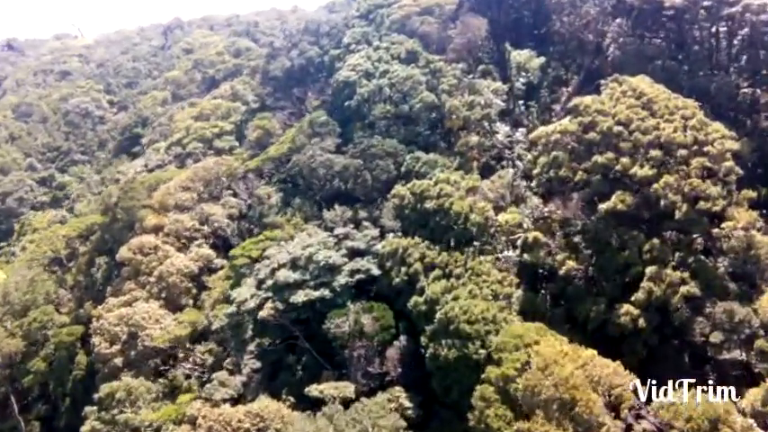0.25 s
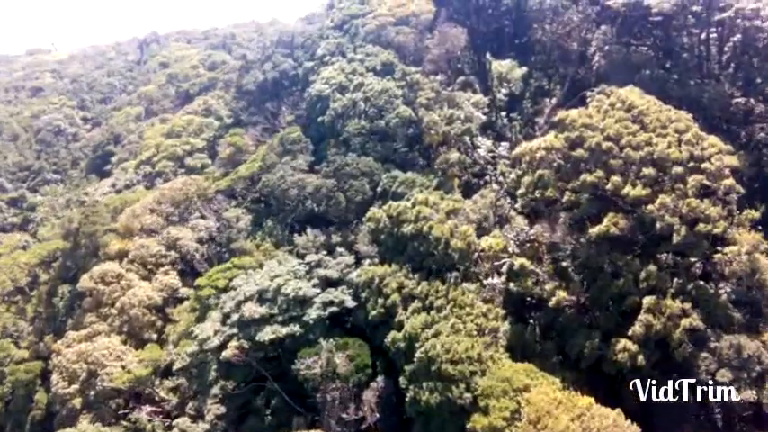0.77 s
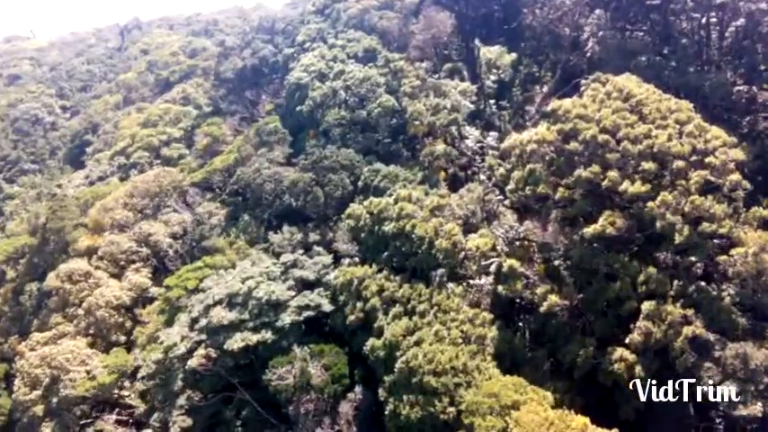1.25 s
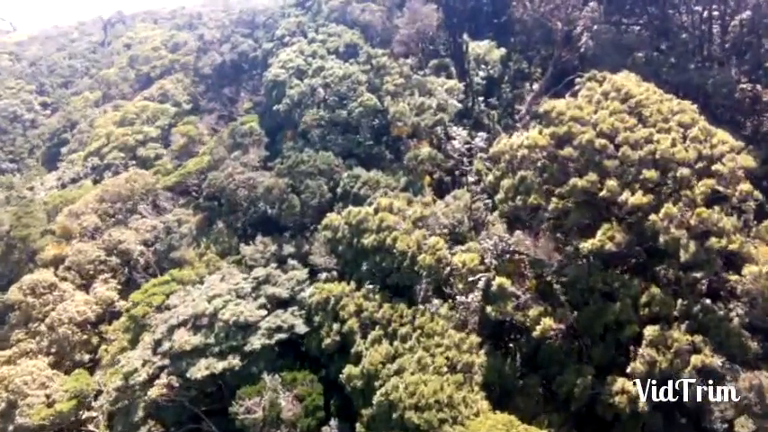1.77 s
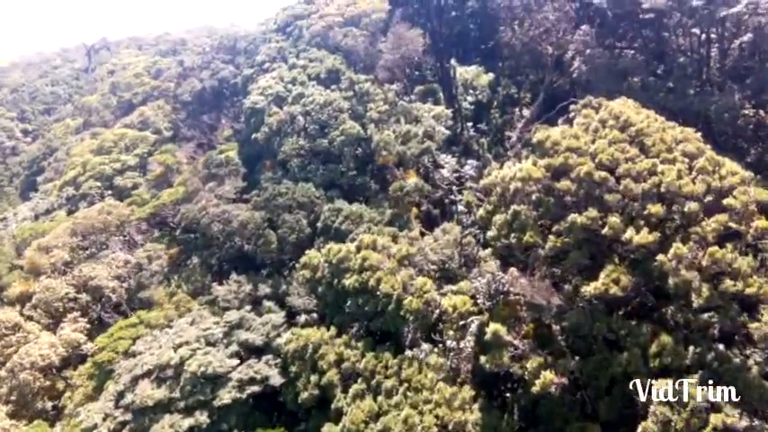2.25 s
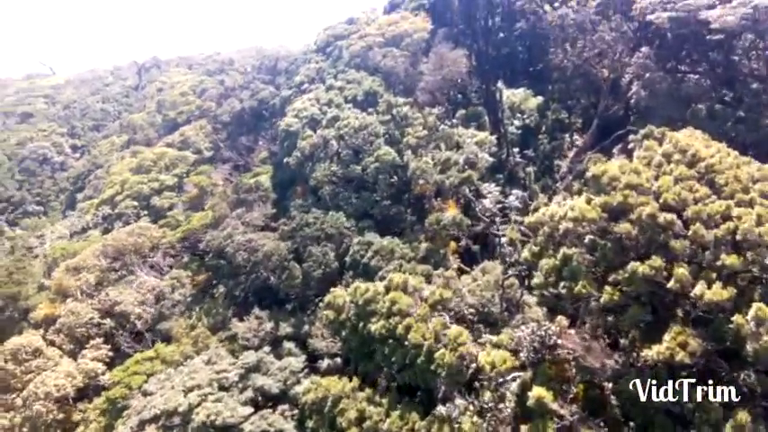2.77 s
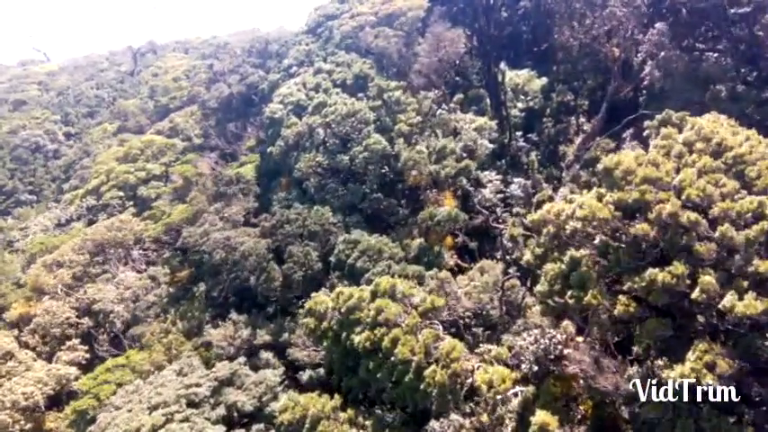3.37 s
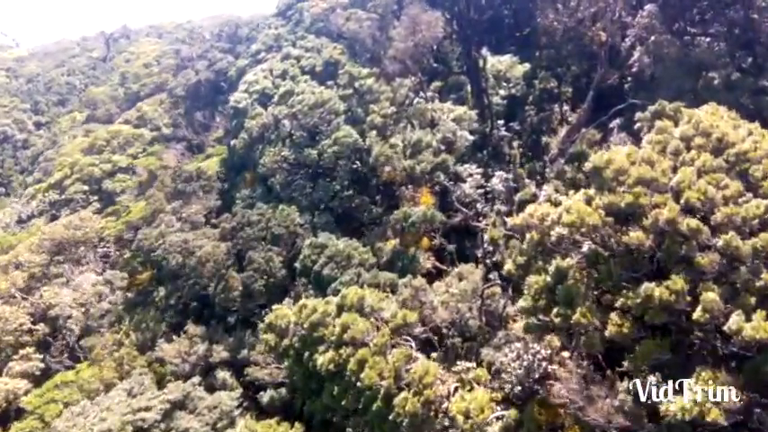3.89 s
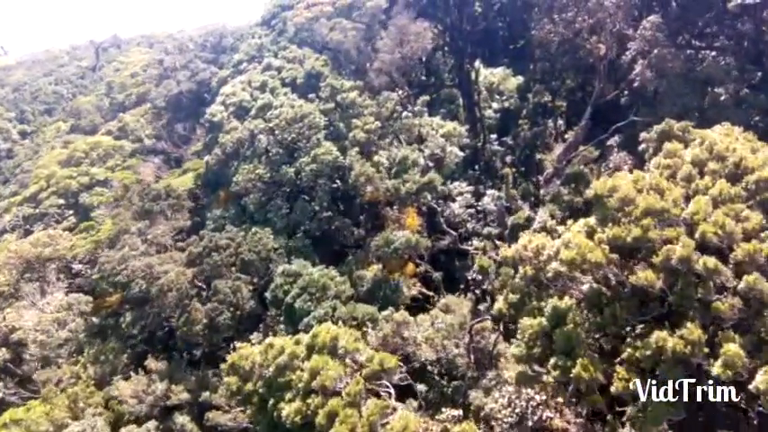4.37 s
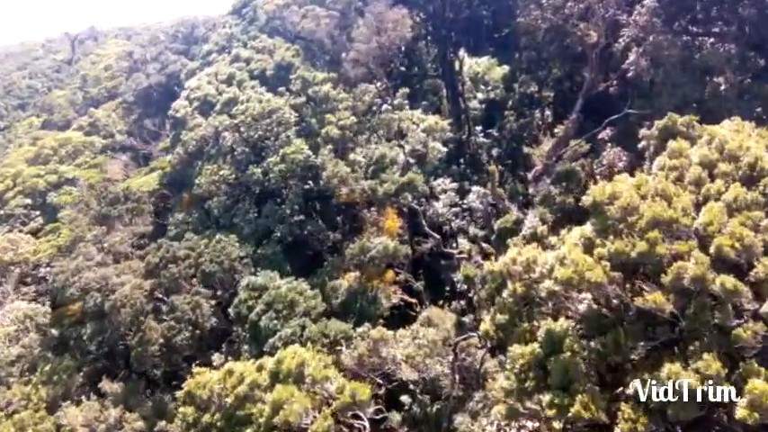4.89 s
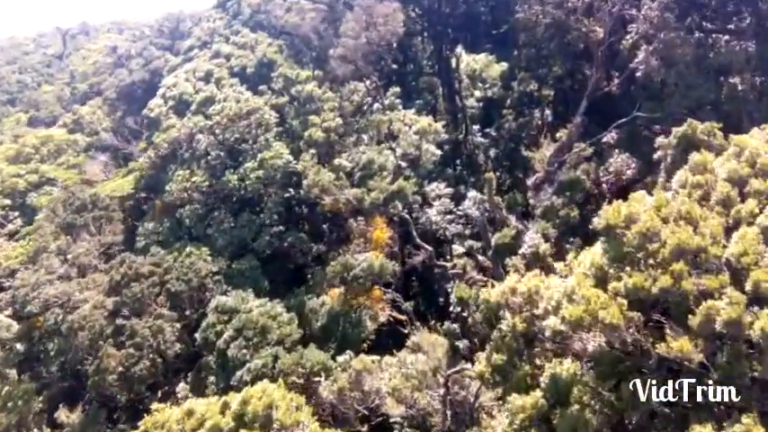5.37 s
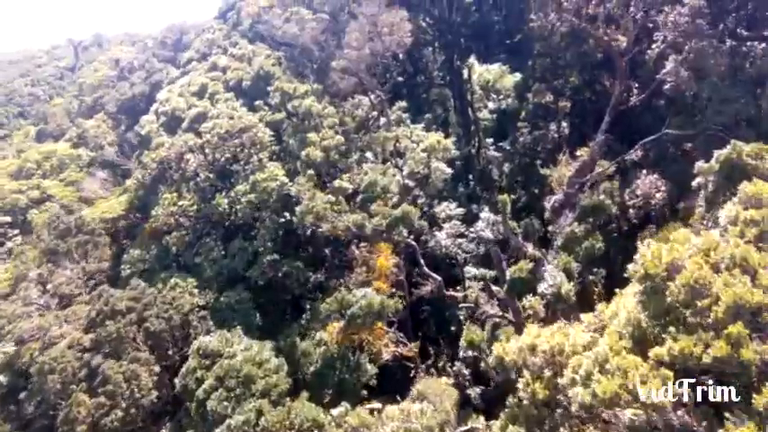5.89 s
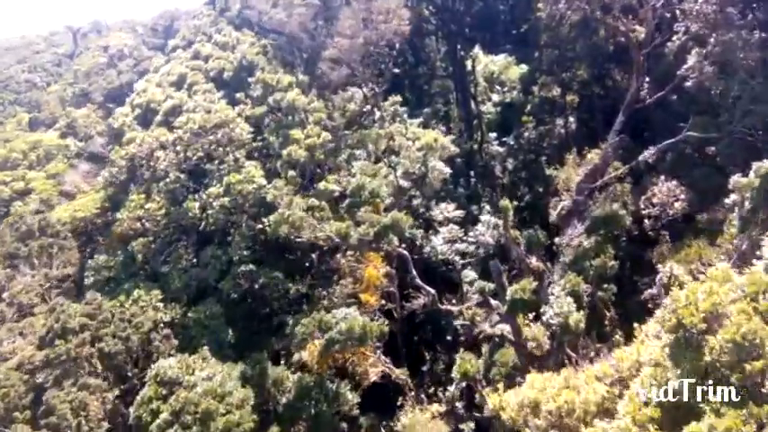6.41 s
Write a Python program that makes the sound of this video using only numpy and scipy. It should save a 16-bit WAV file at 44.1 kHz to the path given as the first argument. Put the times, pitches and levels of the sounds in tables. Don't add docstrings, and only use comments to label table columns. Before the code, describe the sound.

Wind pops and flutters hard against a small stereo microphone, heavier in the left ear, the right one sheltered. Beneath it steel wheels run over a stranded wire with a rough, hissing, metallic whirr and a faint wavering hum that gradually sinks. Later the wind drops to short, weak puffs, and the wheel grind stays in front, slightly quieter, broken by tiny metallic ticks. Outdoors, dry and close.

```python
import sys
import numpy as np
from scipy import signal
from scipy.fft import rfft, irfft, next_fast_len
from scipy.io import wavfile
from scipy.ndimage import uniform_filter1d

SR = 44100
rng = np.random.default_rng(int(sys.argv[2]) if len(sys.argv) > 2 else 0)


def nominal_scale(level):
    x = np.asarray(level, float) / 20
    return 10 ** x


def unload_audio(sound):
    columns = np.transpose(np.atleast_2d(sound))
    steps = np.round(np.clip(columns, -1, 1) * 32767)
    wavfile.write(sys.argv[1], SR, steps.astype(np.int16))


N = 292824
SIZE = next_fast_len(N + 8192)
HZ = np.arange(SIZE // 2 + 1) * SR / SIZE + 1e-3


def at_hz(points):
    hz, value = np.transpose(points)
    return np.interp(np.log(HZ), np.log(hz), value)


def rms_one(x):
    return x / np.sqrt(np.mean(x ** 2) + 1e-20)


def drift(rate):
    r = np.exp(-40 * np.pi * rate / SR)
    noise = rng.standard_normal(N // 20 + 2002)
    slow = signal.lfilter([1], [1, -2 * r, r * r], noise)[2000:]
    return np.interp(np.arange(N) / 20, np.arange(len(slow)), rms_one(slow))


def shape(x, response):
    return irfft(rfft(x, SIZE) * response, SIZE)[..., :N]


def ring(clicks, hz, width_hz):
    r, w = np.exp(-np.pi * width_hz / SR), 2 * np.pi * hz / SR
    return signal.lfilter([0, np.sin(w)], [1, -2 * r * np.cos(w), r * r], clicks + 1e-18)


GUST_ATTACK_S, GUST_RELEASE_S, LULL_DB = 0.038, 0.038, -48


def gust_strength(gusts):
    t = np.arange(0, N + 50, 50) / SR
    start_s, length_s, db = np.transpose(gusts)[:, :, None]
    swell = np.clip((t - start_s) / GUST_ATTACK_S + 1, 0, 1)
    decay = np.exp(-np.maximum(t - start_s - length_s, 0) / GUST_RELEASE_S)
    total = nominal_scale(LULL_DB) + (nominal_scale(db) * swell * decay).sum(axis=0)
    return np.interp(np.arange(N) / SR, t, 20 * np.log10(total))


# frequency in Hz, level in dB per Hz.
WIND_SPECTRUM = [(20, -9), (45, -27.5), (70, -4), (110, 5.5), (160, 1), (250, 0.5), (350, -4), (500, -18.5),
                 (800, -8.5), (1500, -120.5)]


def rumble(gust_db, per_s, lumpy_db, calm_db):
    born = rng.random(N) < per_s / SR
    sign = np.where(rng.random(N) < .7, 1, -1)
    sizes = nominal_scale(2.0 * np.minimum(rng.exponential(1, N), 3)) * sign
    eddies = rms_one(born * sizes) + 0.59 * rng.standard_normal(N)
    colour = nominal_scale(at_hz(WIND_SPECTRUM))
    bright = shape(eddies, colour)
    dull = shape(bright, 1 / (1 + 1j * HZ / 220))
    strong = np.clip((gust_db + 30.5) / 14, 0, 1)
    mixed = strong * rms_one(bright) + (1 - strong) * rms_one(dull)
    breeze = rms_one(shape(rng.standard_normal(N), colour / (1 + 1j * HZ / 70)))
    return nominal_scale(calm_db) * breeze + nominal_scale(gust_db + lumpy_db * drift(27)) * mixed


POPS_PER_S, POP_OVER_GUST_DB, POP_SPREAD_DB = 55, 5, 4.5
POP_WIDTH_MS, POP_WIDTH_SPREAD = 1.6, 0.22
POP_WIDER_PER_DB = .055
POP_ROOM_S = .009


def ordinary_pops(gust_db, strong):
    place, size, width = rng.random(400), rng.standard_normal(400), rng.standard_normal(400)
    s = (np.arange(400) + .6 * place) / POPS_PER_S
    peak_db = np.interp(s * SR, np.arange(N), gust_db) + POP_OVER_GUST_DB
    peak_db = peak_db + POP_SPREAD_DB * np.clip(size, -2, 1)
    wider = -POP_WIDER_PER_DB * np.clip(peak_db + 14.5, -20, 0)
    width_ms = POP_WIDTH_MS * np.exp(POP_WIDTH_SPREAD * width + wider)
    free = np.abs(s[:, None] - np.array(strong)[:, 0]).min(axis=1) > POP_ROOM_S
    return list(np.transpose([s, peak_db, width_ms])[free & (s < N / SR)])


def pops(rows):
    out, ms = np.zeros(N + 600), (np.arange(600) - 300) * 1000 / SR
    for s, peak_db, width_ms in rows:
        at = round(s * SR)
        out[at:at + 600] += nominal_scale(peak_db + 1.0) * np.exp(-2.4 * (ms / width_ms) ** 2)
    vent = signal.butter(2, 75., "high", fs=SR, output="sos")
    return signal.sosfilt(vent, out[300:N + 300])


# start in seconds, length in seconds, strength in dB.
GUSTS_LEFT = [(.06, 0.5, -23.5), (.66, 0.45, -16), (1.18, .54, -19), (1.80, 0.35, -23), (2.31, 0.46, -24.5),
              (3.05, 0.12, -24), (3.28, 0.055, -28.5), (3.48, .14, -30), (3.66, 0.3, -27),
              (4.25, 0.22, -38), (4.62, 0.12, -30.5), (4.8, 0.075, -25.5), (4.93, 0.12, -24.5),
              (5.14, 0.17, -28.5), (5.45, 0.087, -40), (5.68, 0.065, -35), (5.8, .05, -42),
              (5.97, 0.034, -36), (6.48, 0.16, -35.5)]
GUSTS_RIGHT = [(.12, .40, -28.5), (.68, .28, -32), (1.03, 0.12, -29), (1.38, 0.12, -33), (1.67, 0.035, -36),
               (2.22, 0.054, -27.5), (3.03, 0.032, -38), (3.36, .1, -38), (4.65, .1, -46), (5.4, .15, -44),
               (6.45, 0.11, -46)]
# time in seconds, peak in dB, width in ms.
STRONG_POPS_LEFT = [(0.2141, -5, 2.7), (0.293, -4.5, 2.1), (0.3495, -3, 1.2), (0.3806, -10, 1.7),
                    (0.4363, -4, 1.15), (0.4685, -9, 1.9), (0.4975, -7, 2.4), (0.6613, -19, 1.9),
                    (0.6865, -12, 1.1), (0.7604, -4.5, 1.9), (0.872, -2.5, 1.2), (0.8857, -10, 1.3),
                    (0.9596, -5.5, 1.7), (1.032, -5, 1.4), (1.0456, -4.5, 1.8), (1.0616, -4, 1.1),
                    (1.0742, -9, 1.4), (1.0974, -6, 1.5), (1.1155, -8.5, 1.6), (1.3352, -6.5, 1.9),
                    (1.4083, -4, 1.4), (1.512, -3, 1.5), (1.5708, -6.5, 1.3), (1.5941, -3, 1.06),
                    (1.6557, -4, 1.6), (1.7028, -6.5, 0.89), (1.8543, -8.5, 0.75), (2.049, -6.5, 1.3),
                    (2.332, -12, 0.65), (2.5719, -7, 2.9)]
STRONG_POPS_RIGHT = [(0.26, -13, 2.5), (0.3057, -15, 1.1), (0.3847, -16, 2), (0.7321, -10, 0.56),
                     (0.8238, -15, 0.67), (0.916, -17, 0.68), (1.1289, -18, 2.2), (1.4817, -9, 1.4),
                     (3.0523, -15, 1.9)]


def wind():
    left_db, right_db = gust_strength(GUSTS_LEFT), gust_strength(GUSTS_RIGHT)
    left = rumble(left_db - 6.0, per_s=160.0, lumpy_db=3.0, calm_db=-40.5)
    right = rumble(right_db - 10.5, per_s=75.0, lumpy_db=7.0, calm_db=-45.0)
    left += pops(list(STRONG_POPS_LEFT) + ordinary_pops(left_db, STRONG_POPS_LEFT))
    right += pops(list(STRONG_POPS_RIGHT) + ordinary_pops(right_db - 4.0, STRONG_POPS_RIGHT))
    return np.array([left, right])


WHEEL_RATIO = .385


def hum(strand_turns, strand_db, wheel_db):
    strands = nominal_scale(1.8 * drift(9)) * np.sin(2 * np.pi * strand_turns + .5 * drift(5))
    wheel = nominal_scale(3.5 * drift(9)) * np.sin(2 * np.pi * WHEEL_RATIO * strand_turns + .8 * drift(7))
    tilt_db = np.array([[-1.5], [1.5]])
    return nominal_scale(strand_db + tilt_db) * strands + nominal_scale(wheel_db - tilt_db) * wheel


# time in seconds, peak in dB, lower mode in dB, upper mode in dB.
JOLTS = [(0.5053, -24, -13, -18), (1.6631, -1.5, -11, -17), (1.7484, -12, -13, -5), (1.8682, -7, -9, -12.5),
         (3.1946, 8, -19, -11), (3.3603, -9, -38, -8), (3.7374, -3, -14, -7.5), (3.7898, -15, -16, -11.5),
         (3.8272, -9, -10, -10), (4.2437, -17, 5, -13), (4.6099, -10.5, 5, -4.5), (4.7905, 6, -13, -15),
         (5.36, -6, 1, -8), (5.7728, -2, -7, -14), (6.0487, -12, -24, -3), (6.5238, -7, -8, -8)]


def jolts():
    out, span = np.zeros(N), 260
    fade = np.hanning(span) * np.exp(-np.arange(span) / 340.0)
    rattle = rng.standard_normal((len(JOLTS), span)) * fade
    for column, (hz, width_hz) in ((2, FRAME_MODES[5]), (3, FRAME_MODES[8])):
        clicks = np.zeros(N + span)
        for row, burst in zip(JOLTS, rattle):
            at = round(row[0] * SR)
            clicks[at:at + span] += nominal_scale(min(row[1] + row[column], -17) - 19) * burst
        out += ring(clicks[:N], hz, 0.94 * width_hz)
    out = shape(out, 1 / (1 + (HZ / 6500) ** 8))
    return np.array([out, np.roll(out, 9)])


def contact(mode_db, hiss_db, strand_turns):
    edges_hz = [0, 700, 1100, 1600, 2100, 3000, 4100, 5400, SR]
    grit = (rng.random(N) < 400. / SR) * 1.6 * np.minimum(rng.exponential(1, N), 2)
    white = rfft(rng.standard_normal((2, N)) * (1 + grit), SIZE)
    together_db = 0.23 * drift(13) + 0.66 * drift(80)
    rocking_db = {1100: mode_db, 5400: hiss_db}
    out = 0
    for low, high in zip(edges_hz, edges_hz[1:]):
        flutter_db = together_db + 0.11 * drift(12) + 0.93 * drift(22) + rocking_db.get(low, 0)
        flutter_db = flutter_db - uniform_filter1d(flutter_db, size=SR // 6)
        band = irfft(white * ((HZ >= low) & (HZ < high)), SIZE)[:, :N]
        out = out + nominal_scale(flutter_db) * band
    return out * (1 + 0.11 * np.cos(2 * np.pi * strand_turns))


# frequency in Hz, width in Hz.
FRAME_MODES = [(944, 24), (1318, 115), (1783, 26), (2350, 220), (3300, 120), (3628, 72), (4390, 90),
               (4465, 55), (4826, 40), (5020, 130), (5885, 100)]
# left port in dB, right port in dB.
FRAME_MODE_DB = [(3.5, -4), (5, 13.5), (9, 11), (-2, -3), (-4.5, -5.5), (10.5, 9), (2.5, -10.5), (5, 2),
                 (12, 1.5), (2.5, -7), (4, -17)]
# frequency in Hz, level in dB per Hz.
GRIND_LEFT = [(300, -7.5), (620, -1.5), (1000, -0.5), (1600, -36.5), (2100, -0.5), (2800, -7.5), (3300, 1),
              (4100, 2), (5400, -6), (5900, 6.5), (6560, 7), (6700, -0.5), (7400, -3), (8000, -15.5)]
GRIND_RIGHT = [(300, -14.5), (620, -7), (1000, -11.5), (1600, -1), (2100, -0.5), (2800, -1), (3300, 4.5),
               (4100, 1.5), (5400, 0.5), (5900, -12.5), (6560, -7), (6700, -11), (7500, -37), (8050, -48.5)]
# frequency in Hz, likeness from 0 to 1.
LIKENESS = [(150, 1), (500, 0.81), (950, 0.68), (1350, 0.6), (1650, 0.63), (1900, 0.76), (2600, 0.62),
            (3800, 0.18), (4800, 1), (6200, 0.2), (6700, 0.96), (7500, 0)]
# frequency in Hz, phase in radians.
LEFT_LEAD = [(300, -.3), (650, -.9), (950, 0), (1450, 1.9), (1750, 1.5), (1950, 2.9), (2350, 1.9),
             (2850, 3.0), (3500, 5.1), (3800, 5.8), (4050, 4.7), (4850, 6.3), (6250, 8.05), (7000, 7.2)]


def frame(mode_db, hiss_db, strand_turns):
    shared, own = contact(mode_db, hiss_db, strand_turns)
    power = np.array([nominal_scale(at_hz(GRIND_LEFT) - 1.5) ** 2, nominal_scale(at_hz(GRIND_RIGHT) + 0.5) ** 2])
    for (hz, width_hz), port_db in zip(FRAME_MODES, FRAME_MODE_DB):
        peak = 1 / (1 + (2 * (HZ - hz) / width_hz) ** 2)
        power += nominal_scale(port_db)[:, None] ** 2 * peak
    power = power / (1 + (260 / HZ) ** 4)
    power = power / (1 + (HZ / 8300) ** 24)
    alike = np.clip(at_hz(LIKENESS), 0, 1)
    late = np.exp(-1j * np.interp(HZ, *np.transpose(LEFT_LEAD)))
    left = shape(shared, np.sqrt(power[0]))
    right = shape(shared, np.sqrt(power[1]) * alike * late)
    right = right + shape(own, np.sqrt(power[1] * (1 - alike ** 2)))
    return rms_one(np.array([left, right]))


START_FRAME_DB, DB_PER_SPEED_DB = -20.0, 0.8456
WANDER_DB, WANDER_PER_S = .9, 9.0


def grind(strand_hz, strand_turns):
    speed_db = 20 * np.log10(strand_hz / START_STRAND_HZ)
    mode_db = WANDER_DB * drift(WANDER_PER_S)
    hiss_db = .5 * WANDER_DB * drift(WANDER_PER_S)
    return nominal_scale(START_FRAME_DB + DB_PER_SPEED_DB * speed_db) * frame(mode_db, hiss_db, strand_turns)


START_STRAND_HZ, SLOWING_HZ_PER_S = 368.4, 18.7


def scene():
    strand_hz = START_STRAND_HZ - SLOWING_HZ_PER_S * np.arange(N) / SR
    strand_turns = np.cumsum(strand_hz) / SR
    tones = hum(strand_turns, strand_db=-46.5, wheel_db=-45.5)
    return wind() + tones + jolts() + grind(strand_hz, strand_turns)


def roll_off(x):
    return signal.sosfilt(signal.butter(12, 9310, fs=SR, output="sos"), x)


def record(dry):
    return roll_off(dry)


dry = scene()
out = record(dry)
unload_audio(out)
```